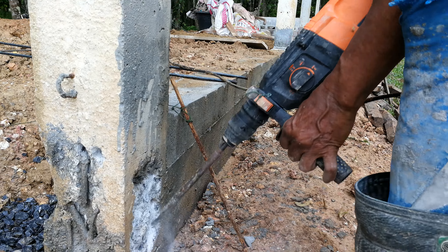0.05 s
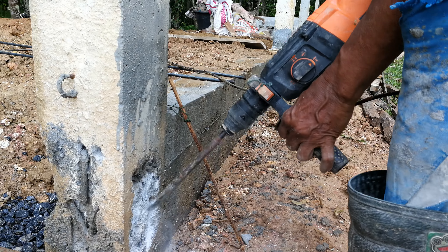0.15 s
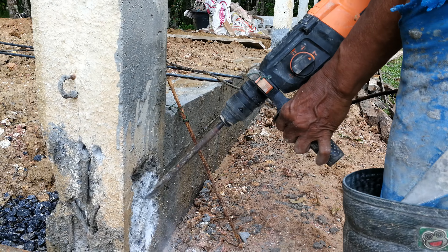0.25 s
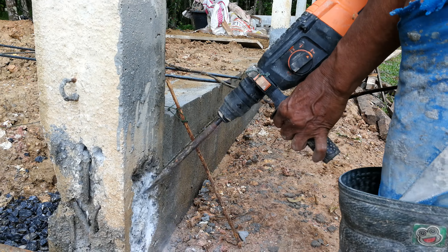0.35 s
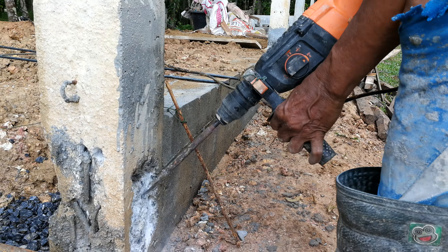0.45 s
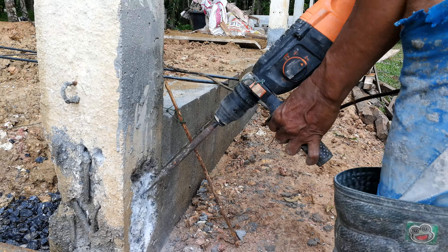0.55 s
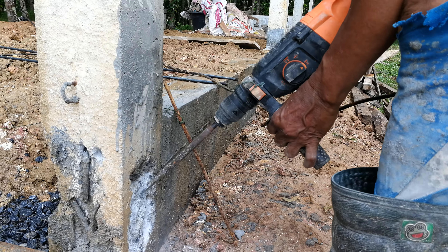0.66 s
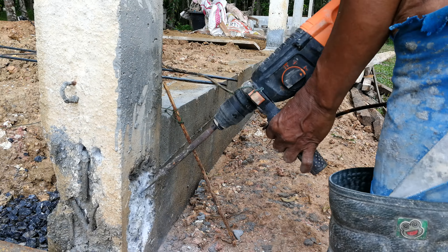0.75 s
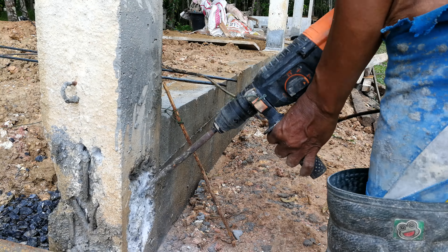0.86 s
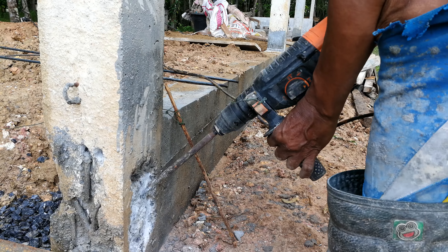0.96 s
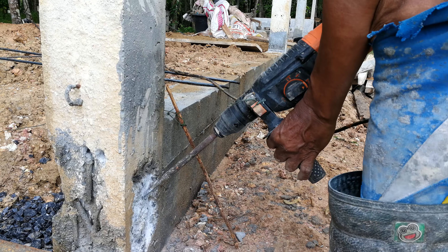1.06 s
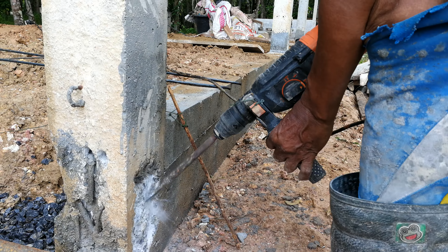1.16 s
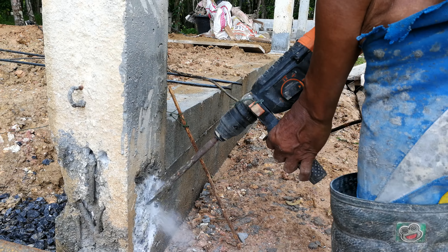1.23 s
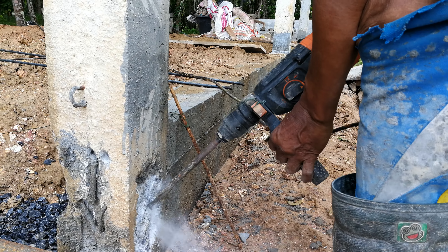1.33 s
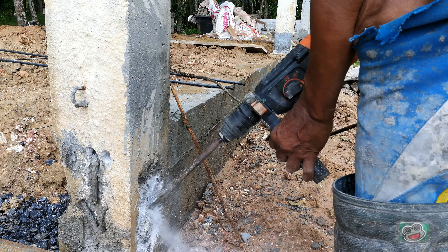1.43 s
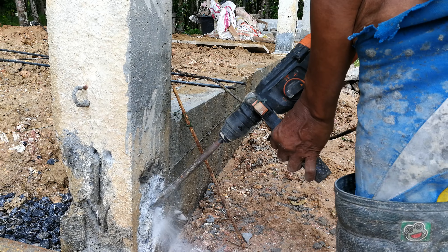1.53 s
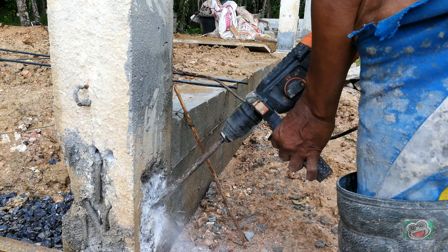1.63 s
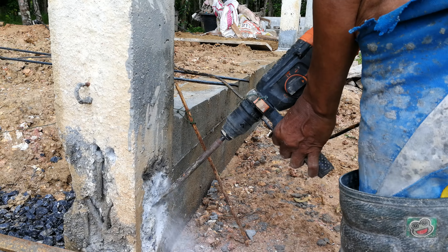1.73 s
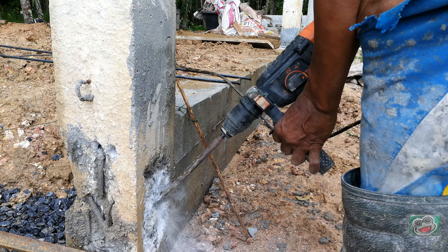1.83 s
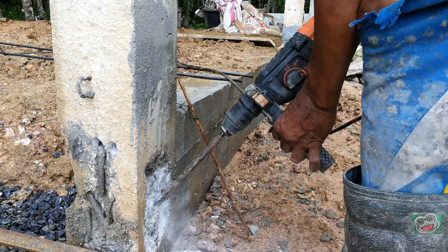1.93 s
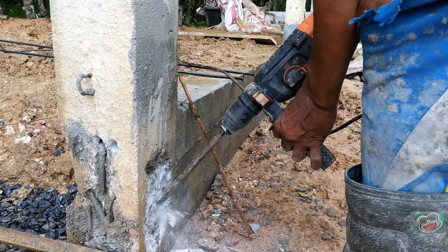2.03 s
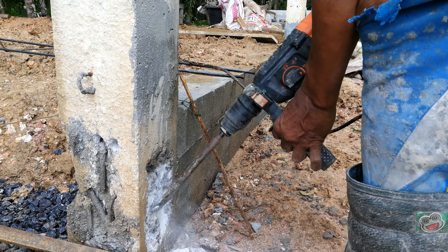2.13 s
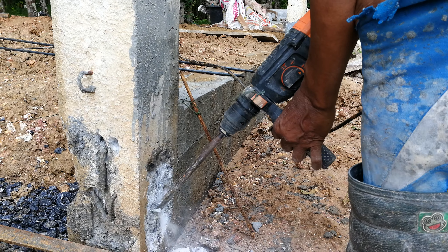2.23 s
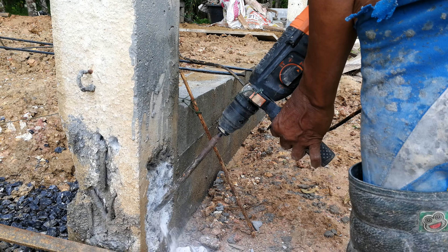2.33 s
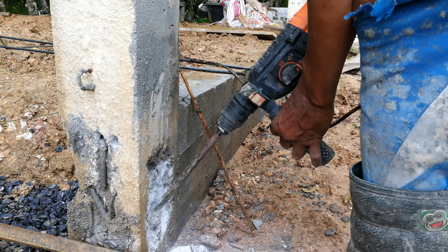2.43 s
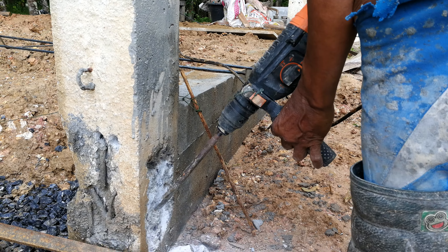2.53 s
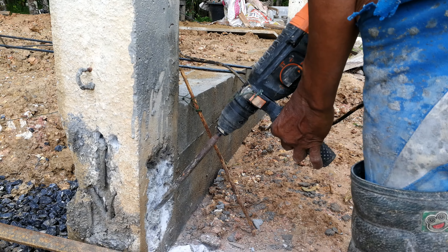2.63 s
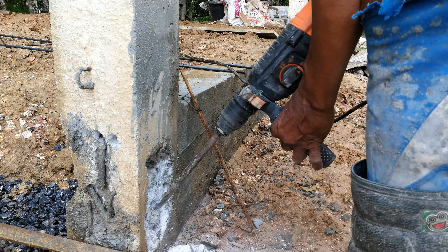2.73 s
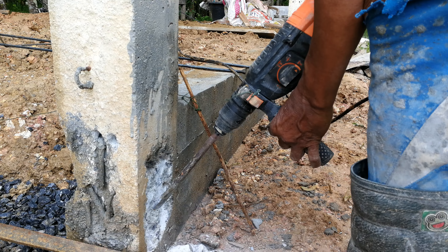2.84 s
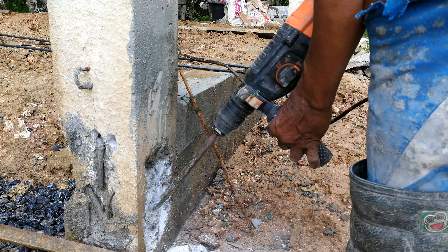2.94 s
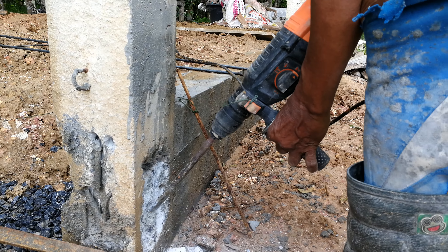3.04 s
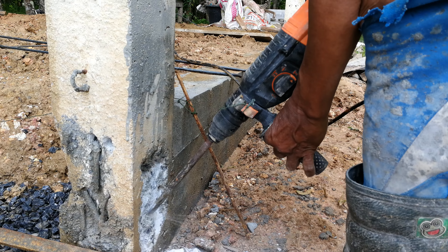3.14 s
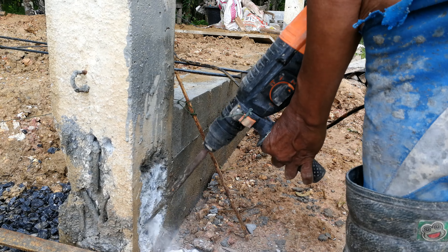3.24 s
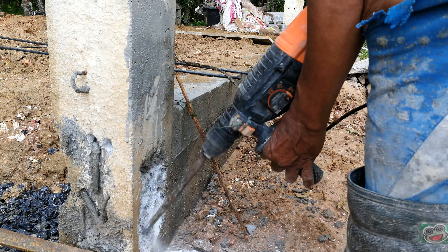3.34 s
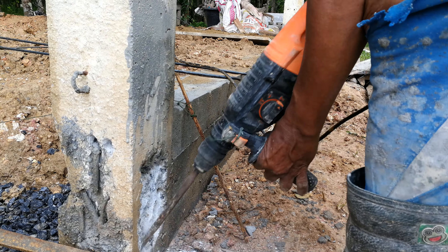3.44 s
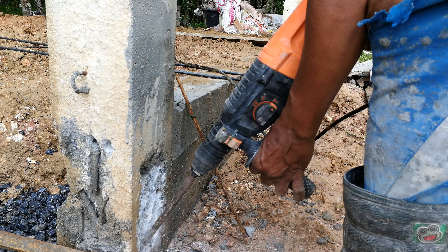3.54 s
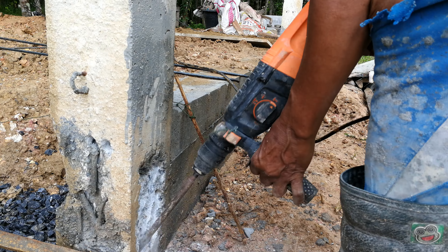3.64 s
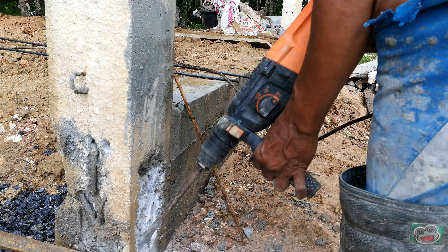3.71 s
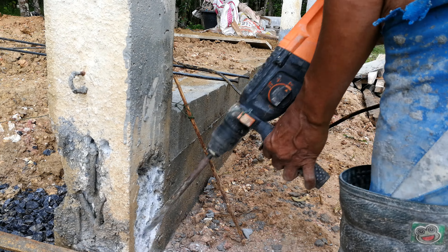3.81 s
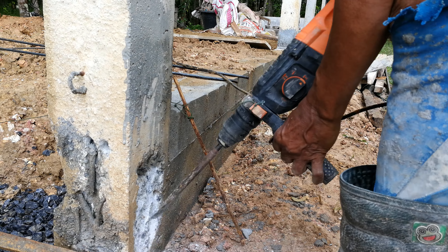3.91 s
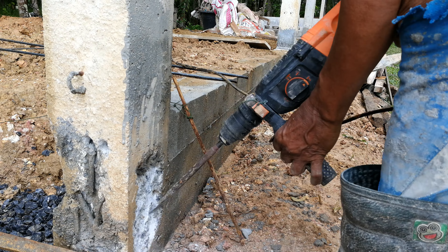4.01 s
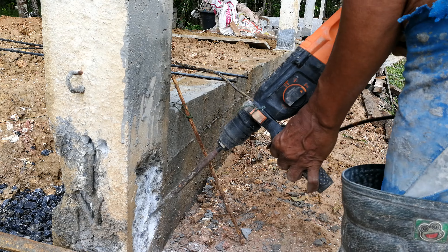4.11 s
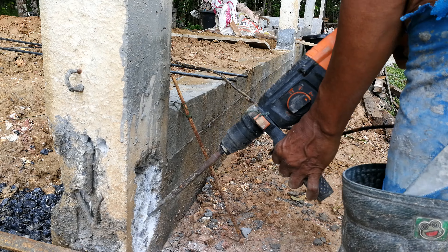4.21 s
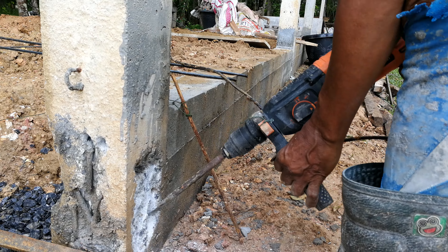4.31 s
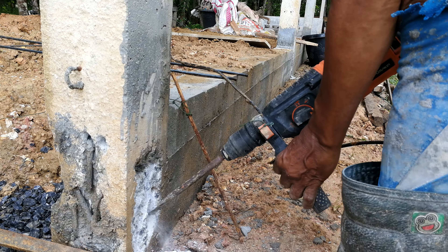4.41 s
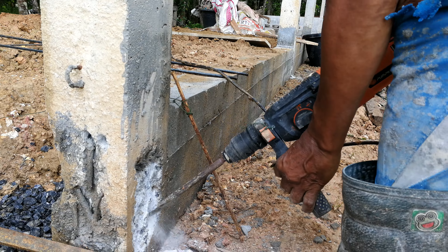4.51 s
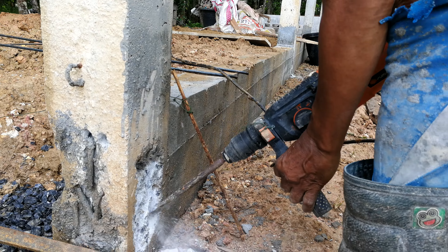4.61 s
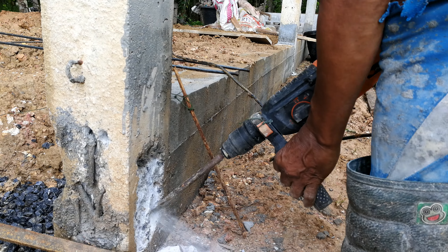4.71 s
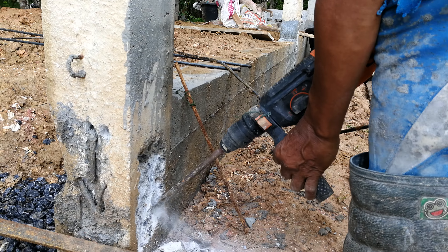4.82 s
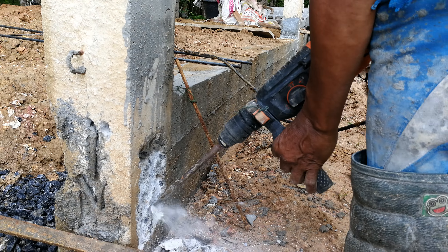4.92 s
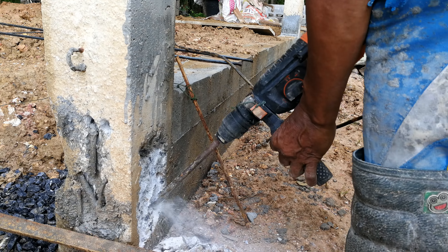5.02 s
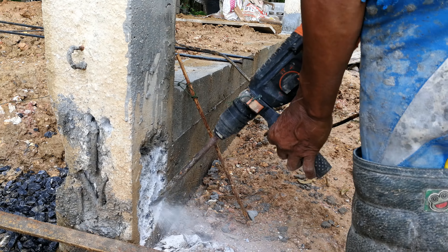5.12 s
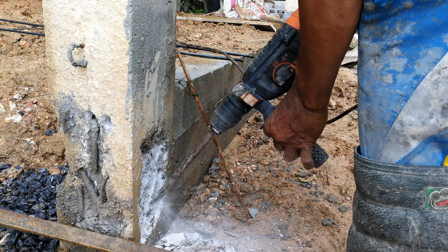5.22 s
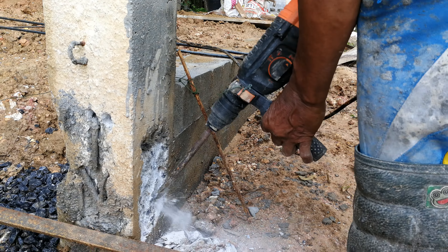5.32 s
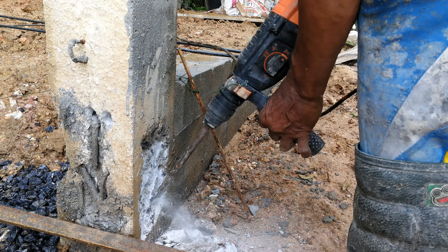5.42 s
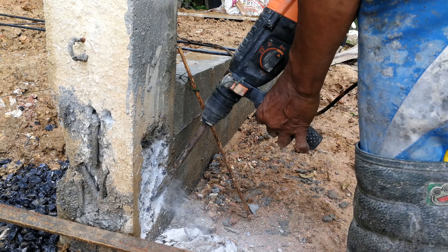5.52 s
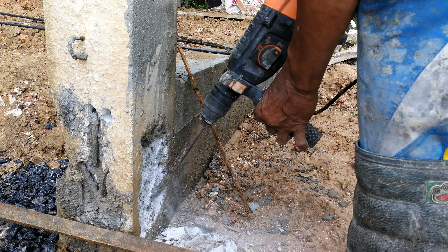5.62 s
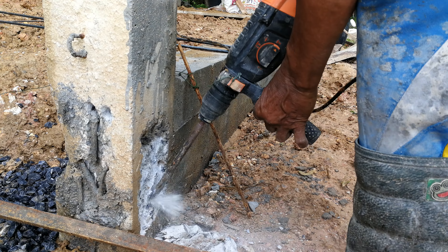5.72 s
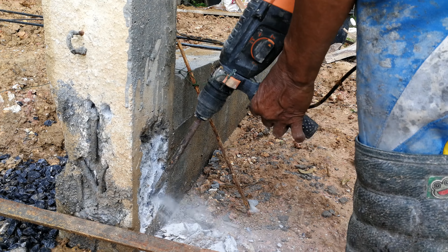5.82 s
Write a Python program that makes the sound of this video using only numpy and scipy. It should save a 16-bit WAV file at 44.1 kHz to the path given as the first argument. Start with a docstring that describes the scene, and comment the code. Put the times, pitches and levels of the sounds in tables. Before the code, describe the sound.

Outdoors, very close to a rotary hammer chiselling a concrete post. At the start the trigger is already released: the rattle and gear whine sink in pitch for about 0.85 seconds, with faint steel clinks. The motor pulls back up, the striker clangs in its housing around 1.0, and from 1.2 to 2.4 the chisel pounds the concrete at roughly seventy blows a second, a bright, gritty, crunching roar with soft low air puffs on the microphone. From 2.4 to 3.1 it runs free, faster at first, hollow, clanging and humming. It bites again at 3.15, dipping in speed, then is switched off near 3.6 and winds down quickly, the whine falling and the loose bit clinking around 3.9 to 4.0. At 4.35 it restarts with a hard bite and hammers steadily to the end at about 6 seconds. Short reflections come from nearby surfaces; left is brighter than right.

```python
"""Rotary hammer on a concrete post

Outdoors, a rotary hammer chisels in long bursts; twice it is switched off and coasts down, first right at the start.
One crank times the steel blows that crush concrete, the knocks in the gear housing, the whirr, the whine and the hum.
Blows and knocks are shaped noise, gears and hum are sine waves, and the loose bit is a set of ringing modes.
Unloaded, the striker slams the housing. Puffs of air buffet the close microphone, which has two ports."""
import sys
import numpy as np
from scipy import signal
from scipy.fft import rfft, irfft, next_fast_len
from scipy.io import wavfile
from scipy.ndimage import uniform_filter1d

SR = 44100
rng = np.random.default_rng(int(sys.argv[2]) if len(sys.argv) > 2 else 0)


def store_pcm(level_fs):
    """Save levels as 16-bit WAV."""
    pcm = np.round(np.clip(level_fs, -1, 1) * 32767).astype(np.int16)
    wavfile.write(sys.argv[1], SR, np.atleast_2d(pcm).T)


N = 258419
# the time of every sample [s], and the frequencies of the filters [Hz]
TIME, BINS = np.arange(N) / SR, np.fft.rfftfreq(next_fast_len(N + 8192), 1 / SR)


def from_db(db):
    """Decibels to gain."""
    return 10 ** (np.asarray(db) / 20)


def rms_one(x):
    """Scale to unit power."""
    return x / np.sqrt(np.mean(x ** 2) + 1e-20)


def in_time(rows):
    """Each column of a curve, read at every sample."""
    s, *columns = np.transpose(rows)
    return [np.interp(TIME, s, c) for c in columns]


def by_hz(points):
    """A table read at every frequency, on a log axis."""
    hz, value = np.transpose(points)
    return np.interp(np.log(BINS + 1), np.log(hz), value)


def resonances(modes):
    """Response of parallel damped modes, alternating in sign."""
    response = 0
    for k, (hz, width, db) in enumerate(modes):
        damping = 1j * BINS * width
        response = response + (-1) ** k * from_db(db) * damping / (hz ** 2 - BINS ** 2 + damping)
    return response


def filtered(x, response):
    """Pass a signal through a frequency response."""
    return irfft(rfft(x, 2 * len(BINS) - 2) * response)[..., :N]


def coloured(x, response):
    """Filter a broadband signal and keep its power."""
    size = np.abs(response)
    return filtered(x, rms_one(size).max() / size.max() * response)


def noise():
    """Unrelated white noise for the two ports."""
    return rng.standard_normal((2, N))


def drift(rate):
    """Smooth random wander of spread 1, changing about `rate` times a second."""
    return rms_one(filtered(rng.standard_normal(N), 1 / (1 + (BINS / rate) ** 2) ** 2))


def swells(rows):
    """Gain of bell-shaped swells, added in power."""
    power = np.zeros(N)
    for s, half_s, db in rows:
        power += from_db(db) ** 2 * np.exp(-np.minimum(((TIME - s) / half_s) ** 2, 50))
    return np.sqrt(power)


def each_turn(turns, spread_db, jitter_s):
    """One click whenever the crank passes a whole turn, uneven in strength and timing."""
    at = np.flatnonzero(np.diff(np.floor(turns)) > 0)
    chance = rng.standard_normal((512, 2))[:len(at)]
    moved = at + (chance[:, 0] * jitter_s * SR).astype(int)
    clicks = np.zeros(N)
    clicks[np.clip(moved, 0, N - 1)] = from_db(spread_db * chance[:, 1])
    return clicks


def dying(clicks, t60):
    """Envelope that jumps up with each click and falls by 60 dB in t60 seconds."""
    power_kept = from_db(-120 / (t60 * SR))  # from one sample to the next
    return np.sqrt(signal.lfilter([1], [1, -power_kept], clicks ** 2 + 1e-18))


STEEL_SHARE = .5  # share of a blow's power that is steel ring, the rest is fresh fracture


def crunch(clicks, t60, tail_db, tail_t60, alike=STEEL_SHARE, count=3):
    """Each click starts a dense burst: part fresh fracture, part steel ring that changes slowly as the tip shifts."""
    age = TIME[:SR // 16]
    fade = from_db(-60 * age / t60) + from_db(tail_db - 60 * age / tail_t60)
    shape = fade * np.minimum(age / .0006, 1)  # a short rise, then the fade
    contacts = np.array([drift(2.44) for _ in range(count)])
    contacts = contacts / np.sqrt(np.sum(contacts ** 2, axis=0))
    steel = np.zeros((2, N))
    for share in contacts:
        ring = shape * rng.standard_normal((2, len(age)))
        steel += signal.oaconvolve((clicks * share)[None], ring, axes=1)[:, :N]
    fracture_power = np.abs(signal.oaconvolve(clicks ** 2, shape ** 2)[:N])
    fracture = np.sqrt(fracture_power) * noise()
    return np.sqrt(alike) * steel + np.sqrt(1 - alike) * fracture


# crank speed under power: (time [s], speed [turns per s])
POWERED_SPEED = [(1.01, 79.64), (1.1, 71.59), (1.19, 80.06), (1.41, 68.99), (1.88, 67.13), (2.18, 69.08),
                 (2.33, 64.76), (2.47, 80.25), (2.76, 80.96), (2.93, 64.36), (3.05, 76.41), (3.2, 70.74),
                 (3.32, 58.03), (3.42, 64.89), (3.57, 67.96), (4.5, 71.1), (5.86, 70.48)]
# trigger released: (off [s], on again [s], first speed [turns per s],
#                    first braking [turns per s lost each second], time in which the braking eases [s])
TRIGGER_COASTS = [(0, .853, 57.737, 45.92, 2.15), (3.57, 4.333, 66.949, 149.3, .368)]
SPIN_UP_S = .105  # how quickly the motor pulls the crank back, as a time constant


def crank_speed():
    """With the trigger released friction slows the crank; switched on, the motor quickly pulls it back up to speed."""
    speed, = in_time(POWERED_SPEED)
    for off, on, first, braking, ease_s in TRIGGER_COASTS:
        age = np.clip(TIME, off, on) - off
        coasting = first - braking * ease_s * (1 - np.exp(-age / ease_s))
        unpowered = (TIME >= off) * np.exp(-np.maximum(TIME - on, 0) / SPIN_UP_S)
        speed = speed + unpowered * (coasting - speed)
    return speed


# leaning on the tool: (start [s], end [s], concrete crack [dB], chisel ring [dB],
#   ring lost as the tip digs in [dB per s], then change against free running of:
#   whirr and fan [dB], housing knock [dB], gear whine [dB], buzz [dB])
PUSHES = [(1.16, 2.38, -5.5, -0.5, 9.5, -1.5, -15, -21, 4), (3.149, 3.46, -7.5, -3, -7, -5, -4.5, 1, 1),
          (3.42, 4.08, -7, -5.5, 24, 0.5, -1.5, -6, 2), (4.364, 5.95, -5, -4, 4, -6.5, -15, 3.5, 3)]
# free running, one row each: (level at the reference speed [dB], gain per doubling of speed [dB])
CRACK_LAW = (-15.5, 1.14)
WHIRR_SPEED_LAW = (-20.5, 6.2)
HOUSING_SPEED_LAW = (-14.5, 4)
FAN_SPEED_LAW = (-29, 12)
WHINE_SPEED_LAW = (-27, 7.1)
BUZZ_SPEED_LAW = (-3.5, 11.4)
AIR_SPEED_LAW = (-60.5, 1.8)
REFERENCE_SPEED = 70  # turns per s
IDLE_RING_DB, AIR_PRESSED_DB = -25, -56
LEAN_S, EASE_S = .04, .16  # time to lean on the tool and to ease off
# too slow a crank barely throws the striker: threshold and its width [turns per s], change of crack and ring [dB]
THROW_SPEED, THROW_WIDTH, WEAK_CRACK_DB, WEAK_RING_DB = 44, 3.5, -10, -20


def efforts(speed):
    """Level of every part in dB: free running follows crank speed; a push sets the chisel and air and shifts the rest."""
    start, end, crack, ring, ring_loss, whirr, housing, whine, buzz = np.transpose(PUSHES)
    age = TIME - start[:, None]
    leaning = np.clip(.5 + np.minimum(age / LEAN_S, (end[:, None] - TIME) / EASE_S), 0, 1)
    leaning = leaning / np.maximum(leaning.sum(0), 1)  # overlapping pushes share the weight
    pressed = leaning.sum(0)
    weak = np.clip((THROW_SPEED - speed) / THROW_WIDTH, 0, 1)
    doublings = np.log2(speed / REFERENCE_SPEED)

    def free(law):
        """Free-running level at this speed."""
        return law[0] + law[1] * doublings

    idle_crack = free(CRACK_LAW) + WEAK_CRACK_DB * weak
    idle_ring = IDLE_RING_DB + WEAK_RING_DB * weak
    return dict(
        crack=(1 - pressed) * idle_crack + crack @ leaning,
        ring=(1 - pressed) * idle_ring + ring @ leaning - ring_loss @ (leaning * age),
        whirr=free(WHIRR_SPEED_LAW) + whirr @ leaning,
        housing=free(HOUSING_SPEED_LAW) + housing @ leaning,
        fan=free(FAN_SPEED_LAW) + whirr @ leaning,
        whine=free(WHINE_SPEED_LAW) + whine @ leaning + backlash_db(),
        buzz=free(BUZZ_SPEED_LAW) + buzz @ leaning,
        air=(1 - pressed) * free(AIR_SPEED_LAW) + pressed * AIR_PRESSED_DB)


# how late the striker lands: (time [s], delay [turns])
STRIKER_DELAY = [(0, 0.12), (.86, 0.019), (2.4, 0.021), (2.9, 0.34), (3.12, 0), (4.5, 0.014)]


def striker(turns):
    """The crank throws the striker once a turn, and it lands a varying part of a turn late."""
    delay, = in_time(STRIKER_DELAY)
    return each_turn(turns - delay, spread_db=1.7, jitter_s=.00005)


# the chisel bites hard: (time [s], relative level [dB])
HARD_BITES = [(2.353, -15), (3.544, -13), (3.62, -10), (4.352, -16), (4.3802, -13)]
# the unloaded bit grazes the concrete and rings: (time [s], half length [s], level [dB])
BIT_GRAZES = [(.22, 0.23, -14.5), (.48, .04, -10.5), (.9, 0.038, -7), (1.1, 0.029, -10), (2.5, .1, -16),
              (2.98, 0.057, -4.5)]
# colour of cracking concrete: (frequency [Hz], relative level per Hz [dB])
CRACK_COLOUR = [(60, -20), (250, -7.5), (600, -10), (1200, -3), (2000, 0), (3500, -1), (4500, 4), (5400, 3),
                (6400, 5.5), (7400, 4.5), (8500, 7.5), (10800, 4), (14500, 5.5), (16000, -0.5)]
# ringing of the chisel pressed on concrete: (frequency [Hz], width [Hz], relative level [dB])
PRESSED_CHISEL_MODES = [(11300, 98, 8), (12860, 440, 17.5), (13940, 1500, -5)]


def chisel(strikes, crack_db, ring_db):
    """The striker hits once a turn: concrete cracks and the chisel rings briefly."""
    bites = np.zeros(N)
    for s, db in HARD_BITES:
        bites[round(s * SR)] = from_db(db + 9.0)
    ringing = np.hypot(from_db(ring_db), swells(BIT_GRAZES))
    crack_clicks = strikes * from_db(crack_db + 4.0) + bites
    ring_clicks = strikes * ringing + bites * from_db(5.5)
    crack = crunch(crack_clicks, t60=0.0083, tail_db=-13, tail_t60=0.038)
    ring = crunch(ring_clicks, t60=0.0097, tail_db=-16.0, tail_t60=0.028)
    return coloured(crack, from_db(by_hz(CRACK_COLOUR))) + coloured(ring, resonances(PRESSED_CHISEL_MODES))


# the loose bit clinks in the chuck: (time [s], level [dB])
CHUCK_CLINKS = [(.218, -31), (0.3, -32), (.42, -38), (3.911, -30.5), (3.942, -30), (4.009, -34)]
# ringing of the free bit: (frequency [Hz], relative level [dB], time to fall by 60 dB [s])
FREE_BIT_MODES = [(6874, 7, 0.17), (8570, 14, 0.1), (9000, -5, 0.19), (9900, 10.5, 0.25), (12360, 6.5, .16),
                  (13500, 2, 0.22)]


def loose_bit():
    """Loose in its chuck, the steel bit rings on at its own frequencies after each clink."""
    out = np.zeros((2, N))
    for hz, mode_db, t60 in FREE_BIT_MODES:
        clicks = np.zeros((2, N))
        for s, db in CHUCK_CLINKS:
            clicks[:, round(s * SR)] = from_db(db + mode_db + 2 * rng.standard_normal(2))
        kept = from_db(-60 / (t60 * SR))  # amplitude kept from one sample to the next
        step = 2 * np.pi * hz / SR        # radians per sample
        out += signal.lfilter([0, np.sin(step)], [1, -2 * kept * np.cos(step), kept * kept], clicks + 1e-18)
    return out


# surfaces nearby: (delay [s], level [dB])
SURFACE_ECHOES = [(.0021, -11), (.0043, -15.5), (.0094, -37), (0.018, -23)]


def echoes(x):
    """Ground, post and wall return short, weaker copies of a sound."""
    response = 1
    for s, db in SURFACE_ECHOES:
        response = response + from_db(db) * np.exp(-2j * np.pi * BINS * s)
    return filtered(x, response)


# unloaded, the striker slams for a few strokes: (time [s], half length [s], level [dB])
STRIKER_SLAMS = [(.1, .07, -20), (.33, .1, -22), (1.0, .05, -14.5), (1.1, .04, -13.5), (2.66, .06, -17.5),
                 (2.83, .05, -20), (3.04, .07, -17.5)]
# what a slam rings with: (frequency [Hz], width [Hz], relative level [dB])
CLANG_MODES = [(980, 160, -7), (1330, 220, -2), (1650, 260, 2), (2150, 300, -5), (3600, 450, -6)]


def slams(strikes):
    """With no concrete to take the blow, the striker hits the housing, which clangs briefly."""
    clang = crunch(strikes * swells(STRIKER_SLAMS), t60=.022, tail_db=-15, tail_t60=.035)
    return coloured(clang, resonances(CLANG_MODES))


# play in the drive within one turn: (place after the blow [turns], relative level [dB])
DRIVE_KNOCKS = [(-.5, -7.5), (-.25, -3.5), (-.09, -4), (0.022, -0.5), (0.163, -14.5)]
# gear housing: (frequency [Hz], width [Hz], relative level [dB])
GEAR_HOUSING_MODES = [(804, 320, -5.5), (974, 35, 3.5), (1233, 31, 3.5), (1424, 810, -2.5), (1804, 65, 7.5),
                      (3550, 230, -22)]
# the note the housing sings at: (frequency [Hz], width [Hz], relative level [dB])
SINGING_NOTE = [(1430, 75, 0)]
# the housing breaks into that note: (time [s], half length [s], level [dB])
SINGING_SWELLS = [(.3, 0.025, -30), (1.85, 0.43, -25), (2.66, 0.2, -22.5), (3.05, 0.13, -24.5),
                  (4.21, 0.034, -28), (4.33, 0.028, -26.5)]
# colour of the whirr: (frequency [Hz], relative level per Hz [dB])
WHIRR_COLOUR = [(100, -50), (400, -18), (600, -5), (800, -0.5), (1200, -3.5), (1800, -1.5), (2400, -3.5),
                (3000, -1), (3600, 1.5), (5500, -6), (8000, -5), (11000, -12.5), (15500, -25.5)]
# motor and fan: (frequency [Hz], width [Hz], relative level [dB])
MOTOR_FAN_MODES = [(2050, 140, 2), (3000, 520, 8.5), (1800, 400, -5)]
SING_FLOOR_DB = -41.5  # level of the singing between its swells


def drive(turns, whirr_db, housing_db, fan_db):
    """Piston and gears knock several times a turn; the housing rings, and the whirr of motor and fan throbs along."""
    knocks = np.zeros(N)
    for offset, db in DRIVE_KNOCKS:
        knocks += from_db(db) * each_turn(turns - offset, spread_db=2.0, jitter_s=.0004)
    throb = dying(knocks, t60=0.03)
    throb = throb / np.sqrt(uniform_filter1d(throb ** 2, size=SR // 10) + 1e-6)  # even out the level
    # the case sends out little far below 550 Hz or above 2600 Hz
    radiation = 1 / (1 + (BINS / 2600) ** 4) / (1 + (550 / (BINS + 1)) ** 4)
    housing = coloured(noise() * (throb + 0.051), resonances(GEAR_HOUSING_MODES) * radiation)
    singing = coloured(noise() * throb, resonances(SINGING_NOTE) * radiation)
    whirr = coloured(noise() * (0.85 * throb + 0.34), from_db(by_hz(WHIRR_COLOUR)))
    fan = coloured(noise() * (throb + 0.09), resonances(MOTOR_FAN_MODES) * radiation)
    singing_gain = np.hypot(from_db(SING_FLOOR_DB), swells(SINGING_SWELLS))
    return (from_db(housing_db - 10.5) * housing + singing_gain * singing
            + from_db(whirr_db + 2.0) * whirr + from_db(fan_db) * fan)


# tones of the meshing teeth: (multiple of the tooth rate, relative level [dB])
TOOTH_TONES = [(1, 5.5), (2, 6.5), (3, 6)]
# how well the gear case radiates: (frequency [Hz], gain [dB])
CASE_RADIATION = [(500, -7), (800, -12.5), (950, 4), (1150, -9.5), (1400, 2), (1650, 7.5), (1800, 5),
                  (1950, -9), (2180, -1), (2400, -16), (2580, -2), (2950, -7), (3500, 1), (4000, -7.5),
                  (4450, -1.5), (4900, -8), (7000, -44)]
TEETH = 33  # teeth meshing per crank turn


def gears(turns, whine_db):
    """Teeth mesh hardest while the piston compresses; the load makes their pitch swing within each turn."""
    load = 0.46 + 0.69 * (.5 + .5 * np.cos(2 * np.pi * (turns - .02))) ** 2.4
    mesh = 2 * np.pi * TEETH * turns + 3.25 * np.sin(2 * np.pi * turns + 1.27)
    whine = np.zeros(N)
    for k, db in TOOTH_TONES:
        tone = np.sin(k * mesh + 0.76 * drift(105))
        roughness = 0.55 * drift(110) * np.cos(k * mesh)
        whine += from_db(db) * (tone + roughness)
    heard = filtered(from_db(whine_db) * load * whine, from_db(by_hz(CASE_RADIATION)))
    return heard * [[1], [0]]  # only in the part that both ports share


# the whine is louder while coasting [dB], and hushed [dB] for a moment [s] after switching on
WHINE_COASTING_DB, WHINE_PULLING_DB, PULL_S = 4.5, -11, 0.18


def backlash_db():
    """Change of the gear whine with the trigger: slack teeth while coasting, tight ones just after switching on."""
    change = np.zeros(N)
    for off, on, *_ in TRIGGER_COASTS:
        pulling = WHINE_PULLING_DB * np.exp(-np.abs(TIME - on) / PULL_S)
        change += np.where(TIME < on, WHINE_COASTING_DB * (TIME >= off), pulling)
    return change


# strength of the crank harmonics: (frequency [Hz], relative level [dB])
BODY_COLOUR = [(70, -83), (140, -53.5), (210, -60), (290, -51), (360, -47.5), (420, -61), (495, -44.5),
               (565, -45), (640, -47.5), (780, -45), (900, -43.5), (1100, -44.5), (1400, -43.5),
               (2400, -40)]
# unbalanced crank and rotor: (multiple of the crank rate, relative level [dB])
UNBALANCED_TONES = [(1, -9.5), (3, -6), (7, -3)]
# the hum swells up: (time [s], half length [s], level [dB])
HUM_SWELLS = [(1.05, .1, -53), (2.68, .15, -40), (3.07, .06, -46), (4.8, .15, -53)]


def body(turns, buzz_db, count=36):
    """The same shaking on every turn makes a buzz of crank harmonics; unbalanced parts add a plain hum in swells."""
    angle = np.linspace(0, 1, 2048)
    harmonic = np.arange(1, count + 1)[:, None]
    start = rng.random((count, 1))
    one_turn = np.sqrt(2) * np.sin(2 * np.pi * (harmonic * angle + start)).sum(0)
    buzz = filtered(np.interp(turns % 1, angle, one_turn), from_db(by_hz(BODY_COLOUR)))
    hum = sum(from_db(db) * np.sqrt(2) * np.sin(2 * np.pi * round(k) * turns) for k, db in UNBALANCED_TONES)
    waver_db = 1.3 * drift(8)
    shaking = from_db(buzz_db + waver_db) * buzz + swells(HUM_SWELLS) * hum
    return shaking * [[1], [0]]  # only in the part that both ports share


# gusts of air against the microphone: (time [s], half length [s], level [dB])
AIR_GUSTS = [(1.22, 0.027, -43), (1.39, 0.056, -29), (1.47, 0.022, -27), (1.53, 0.0092, -28),
             (1.59, .015, -33), (1.81, 0.014, -34), (1.89, 0.019, -40.5), (2.14, 0.011, -41),
             (3.23, .025, -45), (4.59, .02, -46), (5.17, .015, -51)]
# colour of a puff of air: (frequency [Hz], relative level per Hz [dB])
PUFF_COLOUR = [(12, -2), (35, -8), (68, -2.5), (130, -6.5), (250, -13.5), (500, -21.5), (2000, -54)]


def buffet(turns, air_db):
    """Each stroke shoves a puff of air at both ports alike, harder in a gust."""
    puffs = each_turn(turns, spread_db=1.5, jitter_s=0.00034)
    rough = dying(puffs, t60=0.025) * rng.standard_normal(N)
    air = 0.35 * rms_one(puffs) + 1.1 * rms_one(rough)
    strength = np.hypot(from_db(air_db), swells(AIR_GUSTS))
    return strength * coloured(air, from_db(by_hz(PUFF_COLOUR)))


# the right port faces away from the tool: (frequency [Hz], level against the left port [dB])
RIGHT_SHADOW = [(100, 0.5), (400, -2.5), (800, -12.5), (1000, -3.5), (1200, -2.5), (1500, 0.5),
                (1800, -2.5), (2200, -2.5), (2800, -6), (4300, -11.5), (6100, 0), (7500, -11.5),
                (10000, -11.5), (15000, -9.5)]
# how alike left and right are: (frequency [Hz], likeness from 0 to 1)
PORT_LIKENESS = [(60, .99), (200, 0.96), (450, 0.62), (750, 0.34), (1300, 0.97), (1800, 0.21), (2500, 0.45),
                 (6000, 0.18), (15000, 0.029)]
# how far the left port leads: (frequency [Hz], phase [radians])
LEFT_LEAD = [(50, -10), (200, 0.3), (500, 1.93), (700, 4), (880, 8), (1200, 6), (2000, 8), (2500, 7),
             (3600, 7.5), (4300, 8.5), (6000, 14), (15000, 17.5)]


def ports(x):
    """The right port hears the left one's sound shifted and shadowed; where they differ, unrelated sound fills in."""
    alike = np.clip(by_hz(PORT_LIKENESS), 0, 1)
    shadow = from_db(by_hz(RIGHT_SHADOW)) * np.exp(-1j * by_hz(LEFT_LEAD))
    shared = filtered(x[0], alike * shadow)
    unrelated = filtered(x[1], np.sqrt(1 - alike ** 2) * shadow)
    return np.array([x[0], shared + unrelated])


FIRST_TURN = .636  # crank position at the start [turns]


def scene():
    """The crank angle times the machine and its air; the chisel and loose bit also return as short echoes."""
    speed = crank_speed()
    turns = FIRST_TURN + np.cumsum(speed) / SR
    level = efforts(speed)
    strikes = striker(turns)
    tip = echoes(chisel(strikes, level["crack"], level["ring"]) + loose_bit())
    machine = (slams(strikes) + drive(turns, level["whirr"], level["housing"], level["fan"])
               + gears(turns, level["whine"]) + body(turns, level["buzz"]))
    return ports(tip + machine) + buffet(turns, level["air"])


CUTOFF_HZ = 15900


def record(dry):
    """The highest peaks are rounded and the treble above the cutoff is removed."""
    rounded = 1.112 * np.tanh(dry / 1.499)
    return filtered(rounded, 1 / np.sqrt(1 + (BINS / CUTOFF_HZ) ** 160))


dry = scene()
out = record(dry)
store_pcm(out)
```